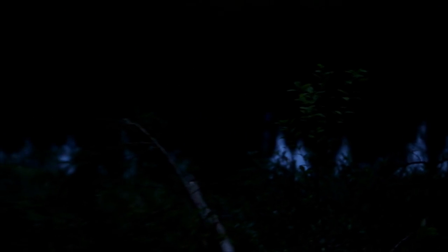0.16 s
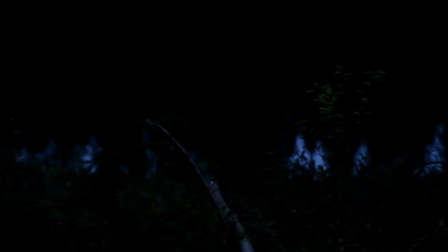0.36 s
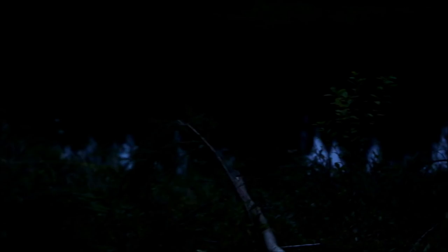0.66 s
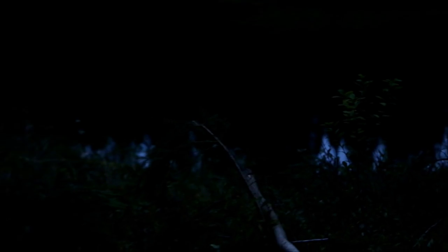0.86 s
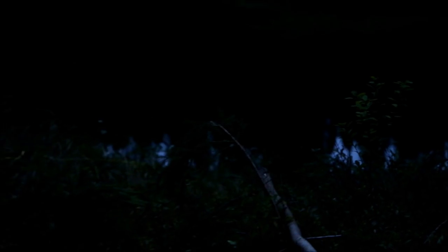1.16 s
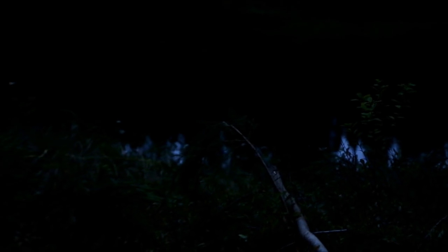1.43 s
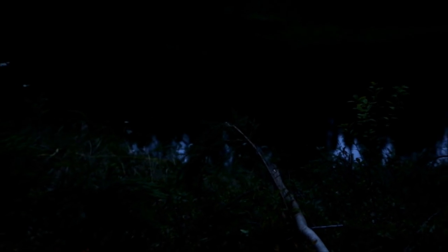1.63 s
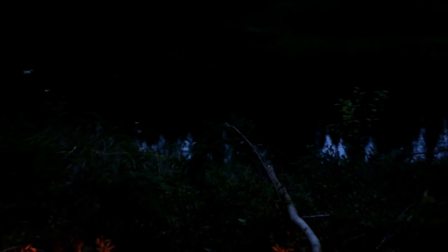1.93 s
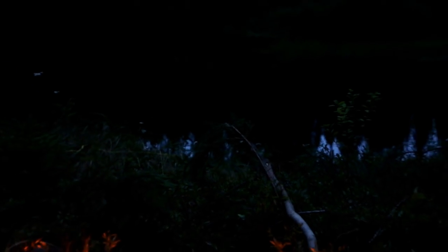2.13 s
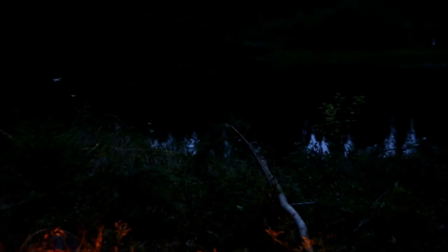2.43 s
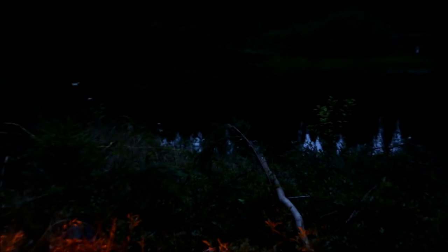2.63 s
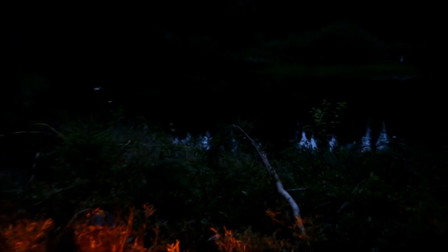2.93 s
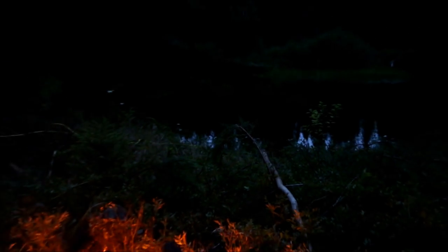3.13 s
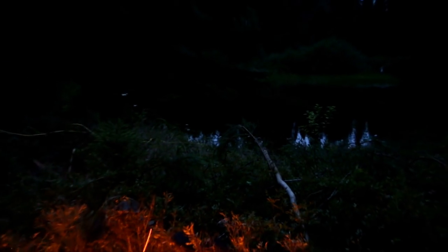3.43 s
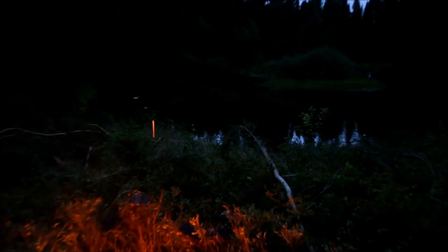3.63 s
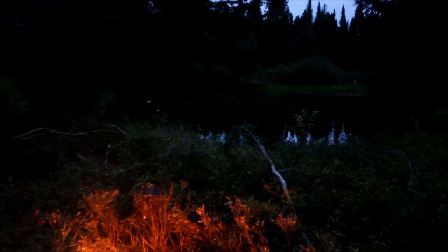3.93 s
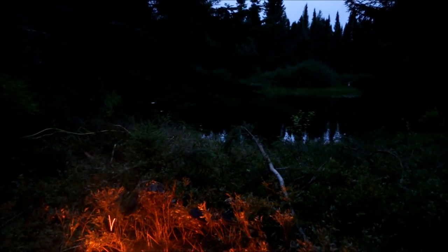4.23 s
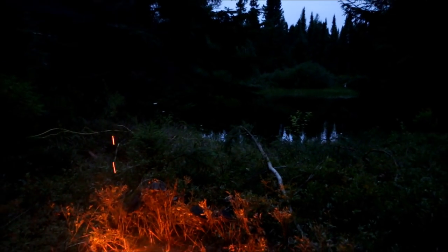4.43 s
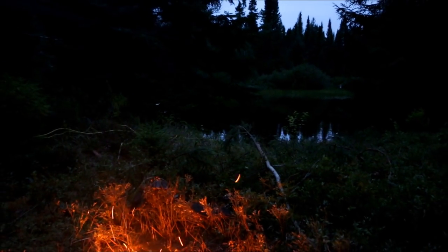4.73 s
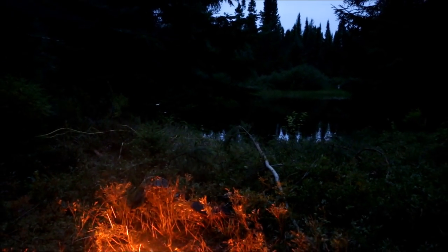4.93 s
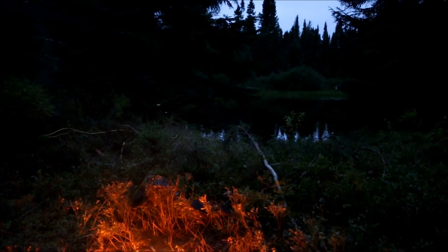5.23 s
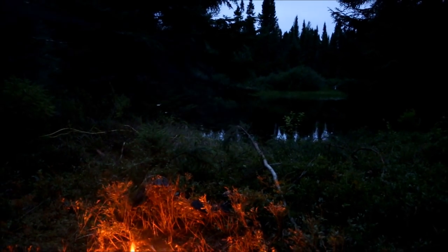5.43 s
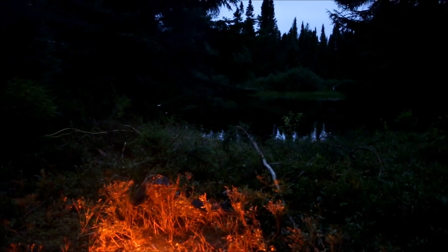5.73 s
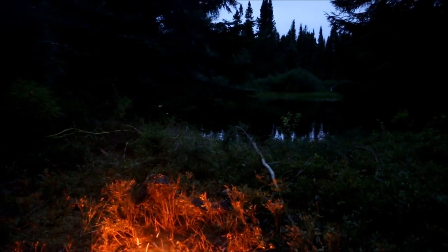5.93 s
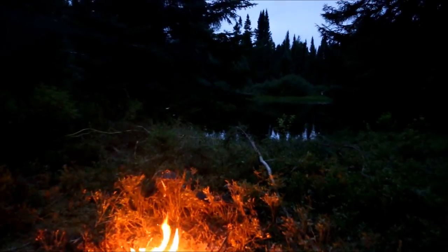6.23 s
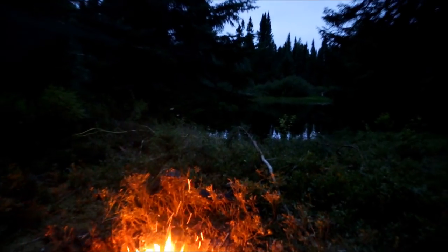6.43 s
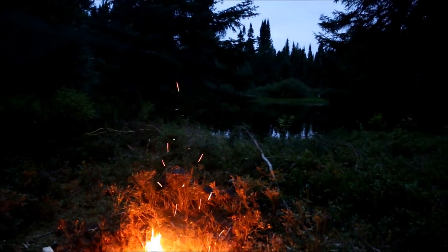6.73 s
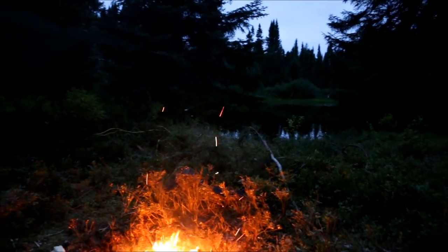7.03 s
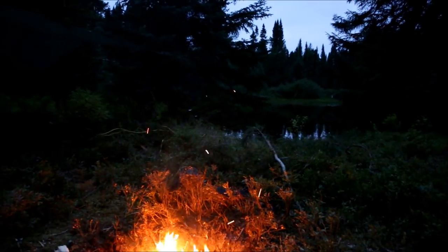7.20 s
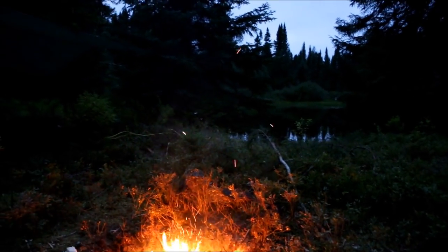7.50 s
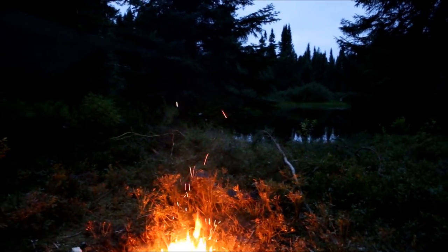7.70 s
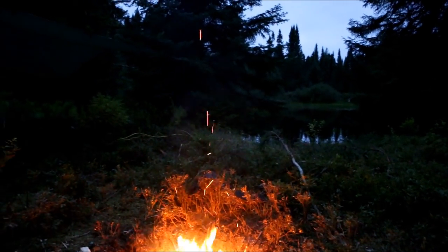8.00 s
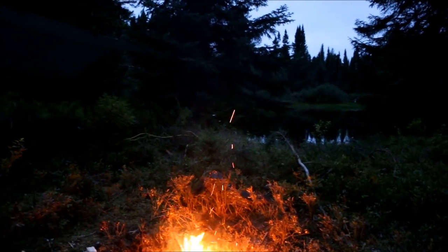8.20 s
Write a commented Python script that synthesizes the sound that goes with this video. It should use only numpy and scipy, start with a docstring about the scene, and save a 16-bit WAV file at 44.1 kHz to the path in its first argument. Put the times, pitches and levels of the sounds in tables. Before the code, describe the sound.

Dry snaps and thumping pops burst from a nearby outdoor fire above a low flame flutter and quiet steam hiss, with brief woodland echoes.

```python
"""The soft wash of an earlier pop, returned by the trees, is heard first, as a brief swell of noise over the
low flutter of flames, drawn air and a faint hiss of steam: noise with fluctuating levels. Tiny ticks are
short pulses at random times. Then pockets of steam and resin burst in the wood of the campfire close by: each
sharp pop is one pressure pulse that rattles among the logs, bounces off the ground and comes back from the trees
as a soft wash. A few more soft swells of rushing noise are flaring gas or distant echoes of pops."""
import sys
import numpy as np
from scipy import signal
from scipy.fft import rfft, irfft, next_fast_len
from scipy.io import wavfile
from scipy.ndimage import uniform_filter1d, map_coordinates

SR = 44100
rng = np.random.default_rng(int(sys.argv[2]) if len(sys.argv) > 2 else 0)


def persist_wave(psi):
    """Save psi, clipped to +-1, as 16-bit WAV."""
    counts = np.round(np.clip(psi, -1, 1) * 32767).astype(np.int16)
    wavfile.write(sys.argv[1], SR, np.atleast_2d(counts).T)


N = 368676

# Soft swells of rushing sound, flaring gas and distant echoes of pops: crest t/s, length/s, crest level/dB
SOFT_SWELLS = [(0.01, .07, -49), (1.046, 0.35, -56), (1.898, 0.11, -55.5), (6.188, 0.062, -49),
               (7.63, 0.17, -55)]
# Relative spectrum of a swell's rush: f/Hz, density level/dB
SWELL_SPECTRUM = [(200, -40), (600, -6), (1200, -7), (2400, -0.5), (3500, -7), (7000, -20), (12000, -50)]
# How hard the flames burn: t/s, mean level/dB
FLAME_LEVEL = [(0.05, -56), (0.23, -58), (3.66, -56), (3.91, -59), (4.42, -56.5), (6.07, -58), (6.39, -55),
               (7.03, -61), (7.36, -56), (8.3, -60.5)]
# Relative spectrum of the flames: f/Hz, density level/dB
FLAME_SPECTRUM = [(20, -27), (45, -18.5), (90, -6), (160, -1.5), (300, 0), (420, -3.5), (560, -13),
                  (1000, -21), (3000, -80)]
# Air drawn through the pile: t/s, mean level/dB
DRAUGHT_LEVEL = [(0.15, -55), (1.25, -54.5), (2.12, -55), (6.18, -55), (6.36, -54), (6.86, -55.5),
                 (7.3, -56)]
# Relative spectrum of the draught: f/Hz, density level/dB
DRAUGHT_SPECTRUM = [(200, -64), (480, -4.5), (700, -0.5), (980, 0.5), (1200, -3), (2400, -6), (4000, -15),
                    (9000, -66)]
# Relative spectrum of the steam: f/Hz, density level/dB
HISS_SPECTRUM = [(800, -17), (2500, 3), (4200, 3), (7000, 0.5), (10000, -2.5), (13000, -5), (16000, -9.5)]
# Likeness of left and right in diffuse noise: f/Hz, correlation/1
STEREO_LIKENESS = [(30, 0.68), (70, 0.77), (150, 0.98), (400, 0.64), (800, 0.49), (1600, 0.14),
                   (3000, 0.068), (12000, 0)]
# Share of a burst that the logs scatter: f/Hz, level/dB
LOG_SCATTER = [(100, -20), (500, -11), (1400, -2), (3500, 1), (9000, 4), (16000, 5)]
# Bands in which scattering keeps a burst's energy: centre f/Hz
EVEN_BANDS = [270, 1000, 3400, 9000]
# Fixed paths over soft ground and through the logs cancel some pitches, double others: f/Hz, level/dB
GROUND_PATHS = [(200, -1), (330, 3), (420, -1), (510, -12), (620, -1), (790, 3.5), (1080, -4), (1400, 3.5),
                (2300, -1.5), (3200, 1.5), (4400, -2), (5250, 2), (6300, -4), (8000, 1)]
# Pockets bursting in the wood: t/s, thump level/dB, thump f/Hz, crack level/dB, crack f/Hz,
# level/dB of the crack beamed at the trees, left minus right level/dB
POCKETS = [(0.2408, -15, 400, -11.5, 5200, -25, -1), (0.2644, -31, 290, -7.5, 5000, -16, -1),
           (0.433, -32, 780, -20.5, 10600, -32, 2), (0.54, -6, 200, -36, 2100, -40, 5),
           (0.6462, 1, 193, -31, 1400, -40, 0), (0.7474, -32, 610, -8, 3180, -24, 7),
           (0.8655, -26, 640, -11.5, 8950, -18, 0), (0.9, -11, 450, -17.5, 5000, -27, 4),
           (1.1405, -11.5, 940, -36, 5000, -35, 0), (1.3297, 2.5, 1160, 6, 7260, -20, -1.5),
           (1.4168, -24, 500, -15, 3620, -33, -3), (1.5441, -9, 1920, -19, 9000, -27, 0),
           (1.6571, -4, 330, 8.5, 6800, -7, 0.5), (1.9865, -14, 350, -16, 6400, -30, 1.5),
           (2.4801, -18, 460, -6, 6650, -12, 0), (2.5986, -11.5, 1170, -12.5, 5800, -27, 0),
           (3.0424, 19.5, 470, 5, 4650, 0.5, 0), (3.1301, -33, 530, -12, 3600, -24, -2),
           (3.237, -2.5, 190, -33, 3000, -39, -4.5), (3.302, -2.5, 403, -25, 3900, -33, 0),
           (3.399, -16, 300, -14, 4800, -34, -1), (3.4117, 5, 370, -5, 7500, -31, 0.5),
           (3.5122, 1.5, 734, -19, 6400, -29, 1), (3.7296, 17, 540, 11, 2560, 7.5, -0.5),
           (3.992, -28, 650, -14, 5500, -29.5, -1), (4.146, -18, 720, -11, 3020, -25, 1),
           (4.219, -5, 540, 0.5, 6240, -24, 0), (4.2399, -7, 350, -8.5, 3760, -24, 0),
           (4.2568, -14, 760, -15, 10700, -25, 2), (4.3832, 3, 510, 6, 4300, 3.5, -1.5),
           (4.6298, -19, 615, -12, 3000, -21, 3), (4.666, -30, 440, -16.5, 8800, -34, 2),
           (4.8014, -11, 760, -26, 7000, -37, -2), (5.2143, -24, 240, -13, 4430, -26, -4),
           (5.3415, -10, 210, -11, 12000, -23, 4), (5.4057, 2, 520, -7.5, 2900, -16, 0),
           (5.4654, -25, 490, -4.5, 6600, -8, -1.5), (5.529, 11.5, 457, -2.5, 4470, -2.5, 0),
           (5.652, -8, 650, -6.5, 4670, -7, 0), (6.055, -26, 400, -12, 7450, -22, 1),
           (6.1247, -16, 940, -14.5, 7940, -29, -1), (6.2124, 7.5, 460, 8, 5850, -12, -1),
           (6.346, -4, 190, -18.5, 8000, -30, -1), (6.3832, 16, 576, 10, 4830, 5, -1),
           (6.5018, 16.5, 714, 7, 3800, 4, -0.5), (6.6103, 0.5, 647, -2, 4900, -11, 0),
           (6.8677, -8.5, 565, -10.5, 6400, -12, -1), (7.1448, -9.5, 630, -12.5, 4970, -23, 0.5),
           (7.3651, 13, 420, 7, 1840, -7, 7), (7.3719, 4, 530, -13, 8800, -26, -4),
           (7.3916, 20, 480, 19.5, 3480, 8.5, 1), (7.686, -31, 590, -15.5, 7800, -30, -1),
           (7.7776, -2, 1000, -2, 3900, -22, 0), (7.9531, -10.5, 380, -18, 8040, -30, 0),
           (8.1173, -11, 626, -16, 4900, -26, -2), (8.255, 0.5, 280, -12, 3200, -25, -1)]
# Shape of a thump of escaping steam: f/(thump f), level/dB
THUMP_SHAPE = [(.04, -34), (.25, -12), (.5, -1), (1, 1), (2, -1.5), (4, -17.5), (16, -31)]
# Shape of a crack of splitting wood: f/(crack f), level/dB
CRACK_SHAPE = [(.02, -22), (.125, -10.5), (.4, -2.5), (1, 0), (2, -8.5), (4, -23.5), (8, -37)]
# Relative answer of the brush and trees all round: t/s after the pop, level/dB
TREE_ANSWER = [(0, -31), (.006, 2), (.025, -1), (.06, -4.5), (.1, -7.5), (.14, -8.5), (.25, -16),
               (.45, -21), (.8, -55)]
# Relative answer of the nearest stand of spruces, which swells late: t/s after the pop, level/dB
STAND_ANSWER = [(0, -38), (.008, -13), (.025, 4), (.045, 2), (.068, 7.5), (.095, 0), (.13, -7.5),
                (.25, -23), (.8, -60)]
# Colour of the trees' answer: f/Hz, level/dB
FOLIAGE_COLOUR = [(100, -17), (500, -15), (1200, -6), (2500, -5), (4500, -4.5), (8500, 1.5), (11500, 6.5),
                  (16000, 3)]
# The right port hears the near fire in another colour: f/Hz, right minus left level/dB
PORT_COLOUR = [(200, -0.5), (1500, 0.5), (4000, 0), (8000, 5.5), (12500, -1.5)]

HISS_DB = -57  # mean level: steam leaves the wood at a steady mean rate
SPLIT_S = 0.00054  # delay at TOP_HZ: the split takes a moment to open, so treble trails bass
TOP_HZ = 15950  # upper band limit


def amp(db):
    """Level definition: an amplitude ratio is ten to the power of dB/20."""
    return 10 ** (np.asarray(db) / 20)


def unit(x):
    """Normalisation: scale a signal to an rms of 1."""
    return x / np.sqrt(np.mean(x ** 2) + 1e-20)


def along(points, hz):
    """Logarithmic pitch: interpolate (f/Hz, value) points on a log axis."""
    f, v = np.transpose(points)
    return np.interp(np.log(hz + 1), np.log(f + 1), v)


def curves(rows):
    """Linear interpolation in time: one value per sample for each column after t/s."""
    s, *columns = np.transpose(rows)
    t = np.arange(N) / SR
    return [np.interp(t, s, column) for column in columns]


def wobble(rate):
    """Band-limited fluctuation: a smooth random curve with rate knots per second."""
    knots = rng.standard_normal(int(N * rate / SR) + 4)
    return map_coordinates(knots, [np.arange(N) * rate / SR])


def filtered(x, response):
    """Linear filtering: multiply the spectrum of x by a response of frequency."""
    n = x.shape[-1]
    size = next_fast_len(n + 4096)
    spectrum = rfft(x, size) * response(np.fft.rfftfreq(size, 1 / SR))
    return irfft(spectrum, size)[..., :n]


def pulse(spectrum, size=1024):
    """Minimum phase: the folded cepstrum gives the most abrupt causal pulse with this spectrum."""
    level_db = along(spectrum, np.fft.rfftfreq(size, 1 / SR))
    cepstrum = irfft(np.log(amp(level_db)))
    cepstrum[1:size // 2] *= 2
    cepstrum[size // 2 + 1:] = 0
    return irfft(np.exp(rfft(cepstrum)))


def add(track, s, sound):
    """Superposition: mix a stereo sound into the track at time s."""
    start = max(round(s * SR), 0)
    room = track[:, start:start + sound.shape[1]]
    room += sound[:, :room.shape[1]]


def rush(spectrum, patchy_db):
    """Turbulent noise: patches of random gain, rms 1, left and right most alike in the bass."""
    noise = signal.stft(rng.standard_normal((2, N)), nperseg=512)[2]
    patches = uniform_filter1d(rng.standard_normal(noise.shape[1:]), size=7, axis=0)
    patches = uniform_filter1d(patches, size=14, axis=1)
    pair = signal.istft(noise * amp(patchy_db * unit(patches)), nperseg=512)[1][:, :N]

    def mid_side_response(hz):
        # independent mid and side at this angle give a correlation of cos(2 * angle)
        angle = np.arccos(np.clip(along(STEREO_LIKENESS, hz), -1, 1)) / 2
        return amp(along(spectrum, hz)) * np.array([np.cos(angle), np.sin(angle)])

    mid, side = filtered(pair, mid_side_response)
    return unit(np.array([mid + side, mid - side]))


def swells():
    """Amplitude envelope: each soft swell of rushing noise rises and dies away in a bell."""
    t = np.arange(N) / SR
    bells = sum(amp(db) * np.exp(-2 * ((t - s) / length) ** 2) for s, length, db in SOFT_SWELLS)
    return bells * amp(0.8 * wobble(60)) * rush(SWELL_SPECTRUM, patchy_db=1)


def burning():
    """Modulated turbulence: flames flutter, air is drawn through the pile and steam hisses."""
    (flame_db,), (draught_db,) = curves(FLAME_LEVEL), curves(DRAUGHT_LEVEL)
    flutter = wobble(80)  # tongues of flame tear off in quick puffs
    flame_gain = amp(flame_db + 2.3 * flutter + 0.48 * wobble(6))
    flame = flame_gain * rush(FLAME_SPECTRUM, patchy_db=1.26)
    draught = amp(draught_db + 0.63 * flutter) * rush(DRAUGHT_SPECTRUM, patchy_db=.5)
    hiss_gain = amp(HISS_DB + 0.61 * wobble(34) + 0.6 * wobble(3.9))
    hiss = hiss_gain * rush(HISS_SPECTRUM, patchy_db=1.15)
    return flame + draught + hiss


def rattle(spread_s, apart, late_db, size=1024):
    """Multipath scattering: direct to both ports, among the logs, then faintly in the brush."""
    t = np.arange(size) / SR
    fade = np.exp(-(t / spread_s) ** 2) + amp(late_db - 60 * t / 0.023)
    shared = rng.standard_normal(size)
    scatter = (shared + apart * rng.standard_normal((2, size))) * fade
    scatter /= np.linalg.norm(scatter, axis=1, keepdims=True)
    paths = signal.fftconvolve(scatter, pulse(LOG_SCATTER)[None], axes=1)[:, :size]
    paths[:, 0] += 1  # direct sound
    # scattering spreads each band out in time but adds no energy to it
    hz = np.fft.rfftfreq(size, 1 / SR)
    power = np.mean(abs(rfft(paths)) ** 2, axis=0)
    even = []
    for centre in EVEN_BANDS:
        band = (hz > centre / 2) & (hz < centre * 1.6)
        even.append((centre, -10 * np.log10(power[band].mean())))
    colour = np.convolve(pulse(even), pulse(GROUND_PATHS))[None, :size]
    return signal.fftconvolve(paths, colour, axes=1)


def ticks(rate, level_db, spread_db, centre_hz):
    """Impulsive fracture: tiny splinters crack at random, rate per second, most of them weakly."""
    out = np.zeros((2, N))
    for when, strength, colour, place in rng.random((int(rate * N / SR), 4)):
        hz = np.clip(centre_hz * 3 ** (2 * colour - 1), 300, 12000)
        db = level_db + spread_db * strength ** 5
        burst = pulse([(hz / 30, db - 29), (hz / 3, db - 4), (hz, db), (hz * 4, db - 13.5)])
        paths = rattle(spread_s=0.0022, apart=0.68, late_db=-9)
        pan_db = 5 * (place - .5)
        tick = signal.fftconvolve(burst[None], paths, axes=1) * amp([[pan_db], [-pan_db]])
        add(out, when * N / SR, tick)
    return out


def pocket(thump_db, thump_hz, crack_db, crack_hz):
    """Dispersed pressure pulse: the low thump of steam and high crack of wood add in power."""
    hz = np.geomspace(20, SR / 2, 80)
    thump = amp(thump_db + along([(thump_hz * k, db) for k, db in THUMP_SHAPE], hz))
    crack = amp(crack_db + along([(crack_hz * k, db) for k, db in CRACK_SHAPE], hz))
    burst = -pulse(np.column_stack([hz, 20 * np.log10(np.hypot(thump, crack))]))
    # quadratic phase makes the delay grow in proportion to frequency
    return filtered(burst, lambda f: np.exp(-1j * np.pi * SPLIT_S * f ** 2 / TOP_HZ))


def forest(burst, answer, grain_db, absorb_db):
    """Diffuse reverberation from trunks and boughs; absorb_db is the loss per second at 10 kHz."""
    noise = rng.standard_normal((2, int(.8 * SR)))
    hz, t, z = signal.stft(noise, SR, nperseg=128)
    boughs_db = grain_db * rng.standard_normal(len(t))
    loss_db = absorb_db * t * (hz[:, None] / 10000) ** 2
    gain = amp(np.interp(t, *np.transpose(answer)) + boughs_db)
    norm = np.linalg.norm(signal.istft(z * gain, nperseg=128)[1][0])  # before colour and loss
    colour = amp(along(FOLIAGE_COLOUR, hz)[:, None] - loss_db)
    tail = signal.istft(z * gain * colour, nperseg=128)[1] / norm
    return signal.fftconvolve(burst[None], tail, axes=1)


def pops():
    """Impulse and echo: bursts thump or snap, rattle among the logs and wash back from the trees."""
    direct, echo = np.zeros((2, N)), np.zeros((2, N))
    for s, thump_db, thump_hz, crack_db, crack_hz, beam_db, pan_db in POCKETS:
        burst = pocket(thump_db, thump_hz, crack_db, crack_hz)
        paths = rattle(spread_s=0.0027, apart=0.59, late_db=-5.0)
        pan = amp([[pan_db / 2], [-pan_db / 2]])
        add(direct, s, signal.fftconvolve(burst[None], paths, axes=1) * pan)
        add(echo, s, forest(amp(-13) * burst, TREE_ANSWER, grain_db=1.0, absorb_db=90))
        # the split beams a narrow crack away from the listener, heard only as the trees return it
        beam = pulse([(crack_hz / 6, -30), (crack_hz / 2, -8), (crack_hz, 1),
                      (crack_hz * 1.07, -1), (crack_hz * 3.9, -23)])
        add(echo, s, forest(amp(beam_db) * beam, STAND_ANSWER, grain_db=1.1, absorb_db=112))
    return direct, echo


def ports(x, lag_s):
    """Interaural difference: sound reaches the left port lag_s before the right; each colours it."""
    side = np.array([[-.5], [.5]])

    def response(hz):
        delay = np.exp(-2j * np.pi * hz * side * lag_s)
        return amp(side * along(PORT_COLOUR, hz)) * delay

    return filtered(x, response)


def scene():
    """Superposition of soft swells, steady burning, the near pops and ticks, and the forest's echo."""
    background = swells() + burning()
    splinters = ticks(rate=36, level_db=-28.5, spread_db=12.5, centre_hz=4900)
    direct, echo = pops()
    return background + ports(direct + splinters, lag_s=.000024) + echo


def record(dry):
    """Saturation and band limiting: clip at full scale, then a steep low-pass at TOP_HZ."""
    return filtered(np.clip(dry, -1, 1), lambda hz: 1 / np.sqrt(1 + (hz / TOP_HZ) ** 160))


dry = scene()
out = record(dry)
persist_wave(out)
```